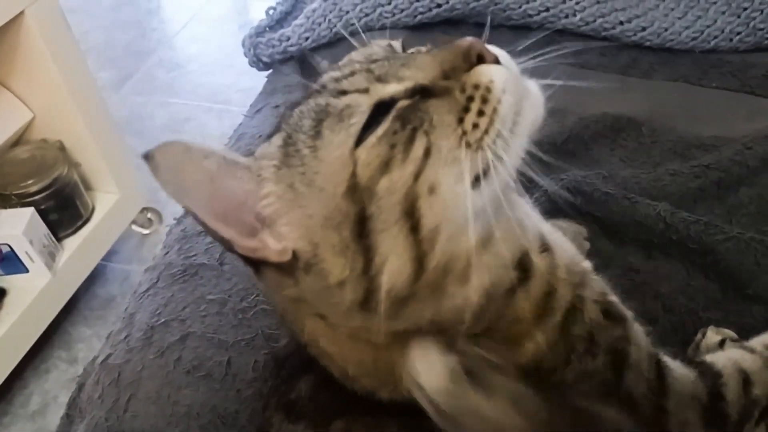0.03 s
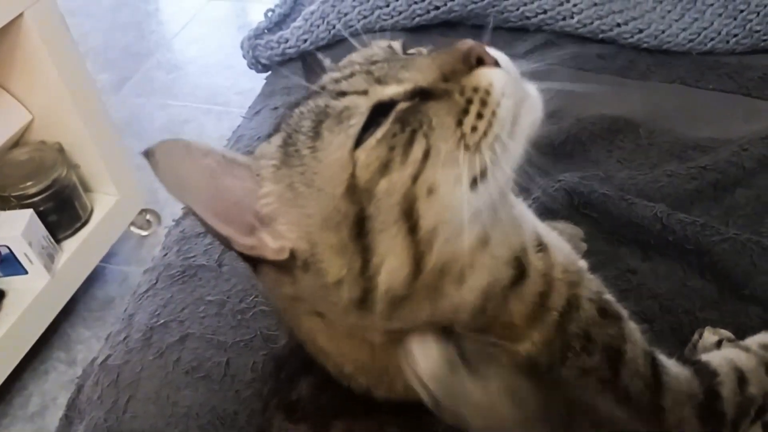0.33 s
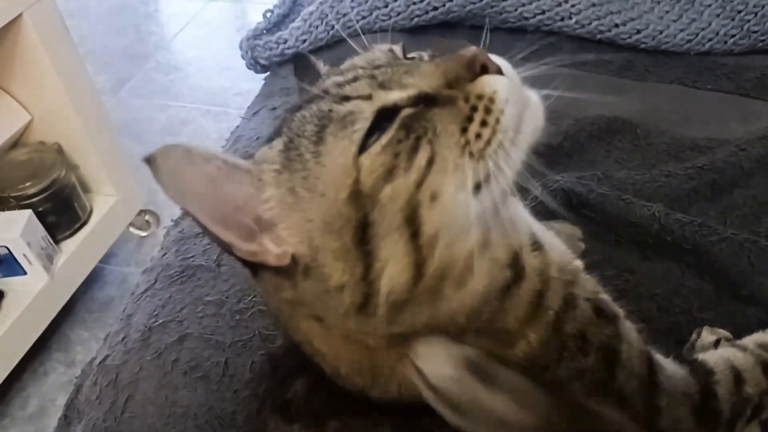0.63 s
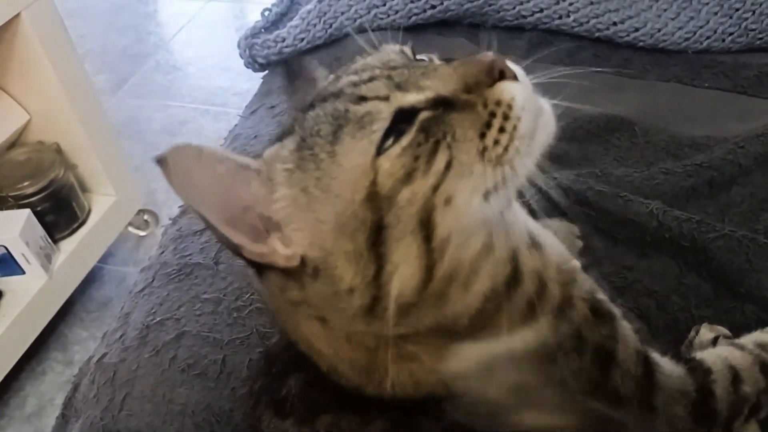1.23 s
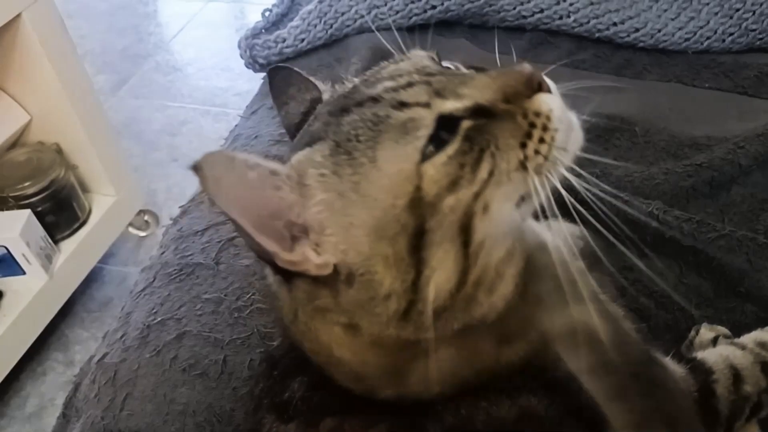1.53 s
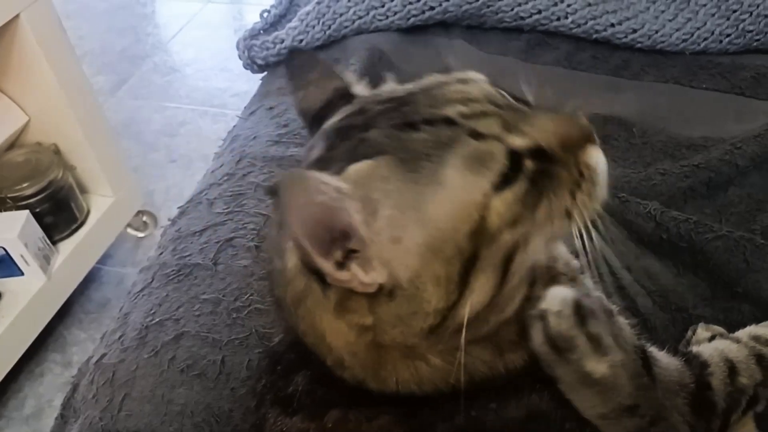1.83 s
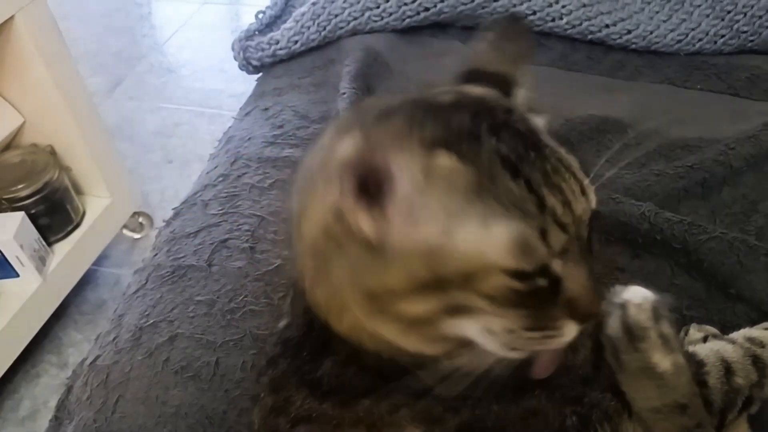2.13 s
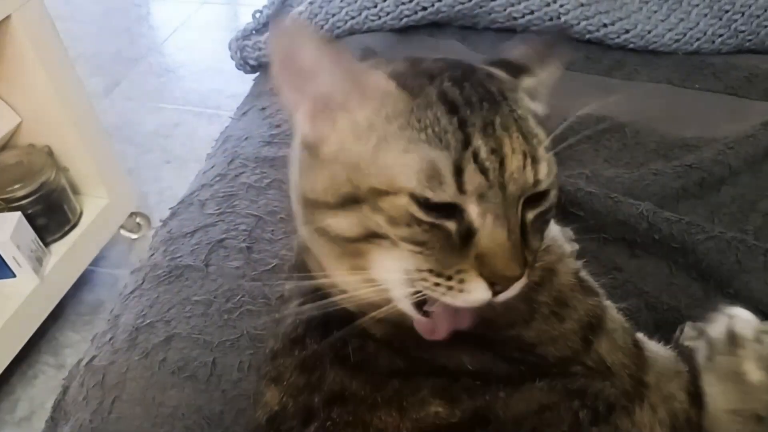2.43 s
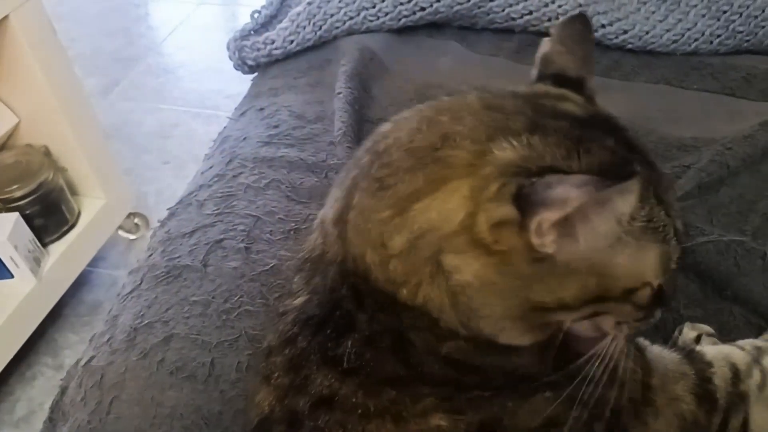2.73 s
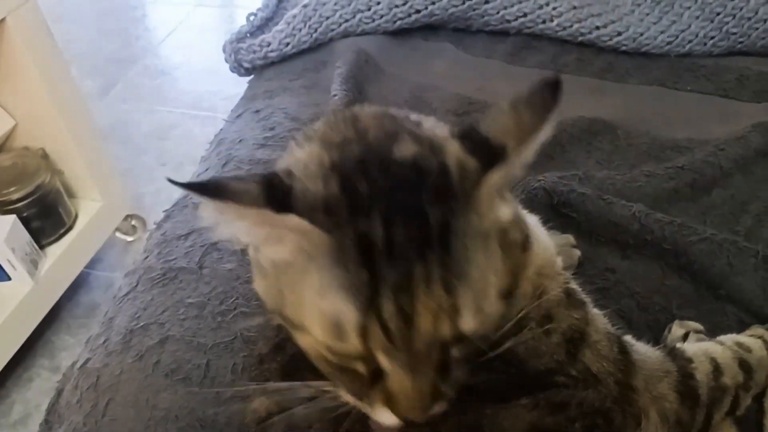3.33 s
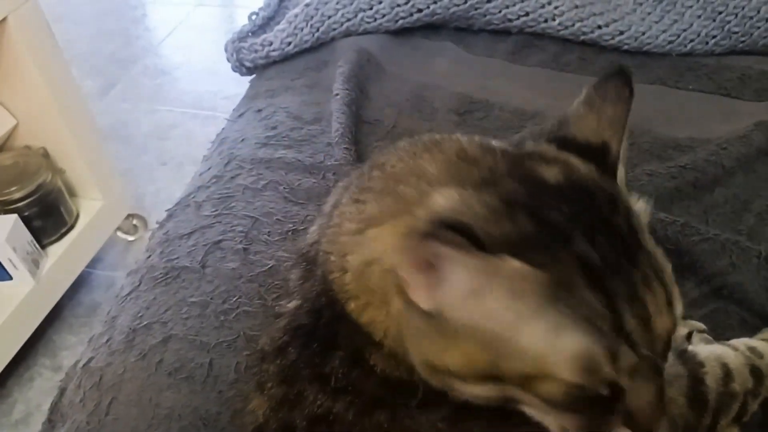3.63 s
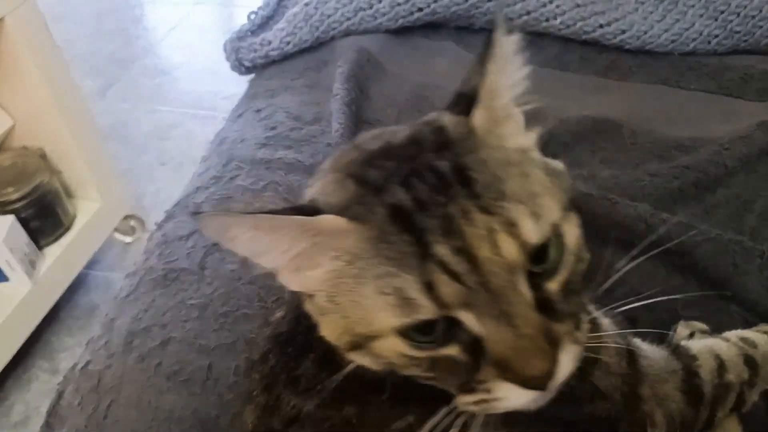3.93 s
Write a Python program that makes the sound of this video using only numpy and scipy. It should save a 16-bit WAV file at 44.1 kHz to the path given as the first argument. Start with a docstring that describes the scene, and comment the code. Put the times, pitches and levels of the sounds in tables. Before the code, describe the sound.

Close by in a quiet room, a cat scratches its fur in quick, faint strokes, rustling a blanket, then licks its coat with small wet ticks. A muffled vehicle swells past outside during the licking.

```python
"""Close to the microphones, a cat on a blanket scratches its neck with a hind paw, claws flicking through
the fur about six strokes a second; then its barbed tongue rasps over the coat with small wet ticks.
Farther off, muffled by the walls, a vehicle pulls away, changes gear and drones past with a swell of
road noise. A soft hiss rises and falls, and the quiet room hums faintly around the stereo pair."""
import sys
import numpy as np
from scipy import signal
from scipy.fft import rfft, irfft
from scipy.io import wavfile
from scipy.ndimage import uniform_filter1d

SR = 44100
rng = np.random.default_rng(int(sys.argv[2]) if len(sys.argv) > 2 else 0)


def digitize_waveform(pressure):
    """Quantize a signal to 16-bit integers and store it at the path in sys.argv[1].

    Rows of a 2-D input are taken as channels; values are limited to [-1, 1].
    """
    field = np.atleast_2d(pressure).T
    bounded = np.clip(field, -1, 1)
    quanta = np.round(bounded * 32767).astype(np.int16)
    wavfile.write(sys.argv[1], SR, quanta)


N = 176400
PAW_PAN_DB = 3.5  # the paw works a little left of centre


def scratching():
    """Each stroke flicks a swell of hairs past the claws, bright tips first; the fur then brushes back."""
    # claw strokes: peak_s, level_db, rise_s
    strokes = [(0.027, -65, 0.0098), (.170, -60, .0055), (0.315, -65, 0.011), (0.462, -63, 0.0075),
               (.617, -66, 0.005), (0.772, -61, 0.0067), (0.926, -60, 0.005), (1.084, -62, 0.0079),
               (1.239, -64.5, 0.0077), (1.406, -71, 0.0097), (1.586, -71.5, 0.014)]
    # spectrum of claws in fur: frequency_hz, relative_db
    fur_spectrum = [(500, -8), (1200, 2.5), (2000, -11), (2700, -3.5), (3700, -13), (5200, -4),
                    (10000, -5.5), (11800, 0), (13500, 2), (15500, -2)]
    fall_share, tail_s, tail_db = .85, .052, -73
    tip_hz, tip_lead_s = 10000, .002
    t, swell, tail = clock(), 0, 0
    for peak_s, level_db, rise_s in strokes:
        age = t - peak_s
        spread_s = np.where(age < 0, rise_s, rise_s * fall_share)
        swell = swell + undb(level_db) * np.exp(-(age / spread_s) ** 2 / 2)
        tail = tail + undb(tail_db) * (age > 0) * np.exp(-abs(age) / tail_s)
    hairs = colour(crackle(per_s=8000, scatter_db=2.5), fur_spectrum) * pan(PAW_PAN_DB)
    tips = signal.sosfiltfilt(signal.butter(2, tip_hz, "high", fs=SR, output="sos"), hairs)
    early = np.interp(t + tip_lead_s / 2, t, swell)
    late = np.interp(t - tip_lead_s / 2, t, swell)
    brush_back = tail * colour(rng.standard_normal((2, N)), fur_spectrum)
    return tips * early + (hairs - tips) * late + brush_back


def paw_taps():
    """The paw meets the skin: two short dry knocks and one longer scrape."""
    # contacts: start_s, level_db, decay_s
    taps = [(.1765, -65, .002), (.3218, -50.5, .0011), (1.068, -61, .022)]
    # bands that each contact rings: pitch_hz, width_hz, offset_db
    modes = [(1050, 700, -1), (1600, 700, -2), (2600, 900, -7)]
    knocks = sum(snap(start_s, pitch_hz, width_hz, level_db + offset_db, decay_s)
                 for start_s, level_db, decay_s in taps for pitch_hz, width_hz, offset_db in modes)
    return knocks * pan(PAW_PAN_DB)


def licking():
    """Tongue barbs catch and slip through the fur in quick jerks."""
    # resonant bands of two licks: middle_s, half_length_s, pitch_hz, width_hz, level_db
    licks = [(2.184, 0.11, 2560, 328, -69.5), (2.18, 0.086, 5700, 2400, -73),
             (2.17, 0.098, 12000, 3500, -74), (3.07, 0.11, 11400, 3241, -72),
             (3.103, 0.094, 6340, 800, -71), (3.066, 0.059, 2640, 390, -72.5)]
    catch_hz, catch_depth_db = 66.1, 4
    catch_phase = phase_of(catch_hz * (1 + 0.1146 * wander(rate_hz=30)))
    catch = undb(catch_depth_db * np.sin(catch_phase))
    t, rasps = clock(), 0
    for middle_s, half_length_s, pitch_hz, width_hz, level_db in licks:
        barbs = catch * crackle(per_s=1300, scatter_db=1.5)
        rasp = unit(ring(ring(barbs, pitch_hz, 2 * width_hz), pitch_hz, 2 * width_hz))
        swell = undb(level_db) * np.exp(-((t - middle_s) / half_length_s) ** 2 / 2)
        rasps = rasps + swell * rasp
    return rasps


def wet_ticks():
    """Films of saliva snap on tongue and lips; the narrow-band ones ring briefly."""
    # ticks and smacks: start_s, pitch_hz, width_hz, peak_db
    ticks = [(2.11, 2520, 300, -55.5), (2.127, 6500, 1200, -58), (2.2318, 2600, 400, -49),
             (2.269, 14000, 3000, -53), (2.282, 10400, 4000, -56), (2.2995, 5550, 1200, -51.5),
             (2.2992, 2600, 550, -53), (2.8135, 1750, 1100, -44.5), (2.977, 6300, 2200, -54),
             (3, 10100, 900, -55), (3.076, 6700, 1000, -53), (3.844, 2650, 260, -48.5),
             (3.846, 8100, 600, -64), (3.877, 2620, 240, -55)]
    return sum(snap(*tick, decay_s=.002) for tick in ticks)


def blanket():
    """The cat's rocking body rubs a dull rustle out of the soft blanket."""
    # loudness of the rustle: time_s, level_db
    levels = [(0, -62.5), (.04, -56), (.1, -58), (.15, -55.5), (.24, -55.5), (.38, -61), (.5, -57),
              (.78, -56), (.88, -55.5), (1.0, -53.5), (1.09, -50.5), (1.2, -56), (1.8, -59.5), (2.2, -54)]
    # spectrum of the rustle: frequency_hz, relative_db
    spectrum = [(30, -29), (56, -6.5), (85, 3), (160, -2.5), (225, 1), (330, -4), (470, -11), (1000, -27.5),
                (4000, -43.5)]
    return colour(diffuse(), spectrum) * undb(curve(levels))


def vehicle():
    """The firing note and its sixth harmonic come through the walls; road noise rings the room."""
    # engine drone, low gear then high gear: time_s, firing_hz, level_db
    engine = [(0, 98, -62), (.23, 115, -54.5), (.3, 113.4, -88), (.62, 114, -71), (.76, 118, -53),
              (.9, 121, -59.5), (1.0, 125, -51.5), (1.15, 128, -49.5), (1.22, 126, -71),
              (1.55, 68.45, -63.5), (2.02, 76, -58), (2.17, 77.85, -48.5), (2.42, 81.5, -44),
              (2.59, 84.3, -39), (2.72, 84.5, -55), (2.84, 85, -47.5), (2.96, 86.5, -48.5),
              (3.16, 88, -58.5), (3.5, 89, -50.5), (3.62, 89.5, -56), (3.88, 90, -49.5), (4, 90, -59)]
    # swell of the road noise: time_s, level_db
    road_levels = [(0, -71.5), (.8, -79), (1.4, -66.5), (1.8, -61.5), (2.15, -54.5), (2.6, -51.5),
                   (3.05, -52), (3.3, -54.5), (3.6, -54.5), (4, -53)]
    # road noise as heard indoors: frequency_hz, relative_db
    road_spectrum = [(50, -34), (75, -4.5), (125, 6.5), (165, -4), (240, 0), (380, -5), (620, -8.5),
                     (720, -9), (920, -5.5), (1250, -17.5), (1550, -12), (1950, -22.5), (2500, -23),
                     (4000, -40.5)]
    # room resonances: pitch_hz, width_hz, level_against_road_db
    room_modes = [(468.3, 7.5, -12.5), (617.4, 19, -12), (530.3, 4, -14), (1551, 21, -21.5)]
    pitch_jitter, waver_db = 0.00836, 0.45
    harmonic_against_road_db, harmonic_waver_db = -14, 4.2
    road_gain = undb(curve(road_levels))
    phase = phase_of(curve(engine) * (1 + pitch_jitter * wander(rate_hz=24.9)))
    drone_db = curve(engine, column=2) + waver_db * wander(rate_hz=22.36)
    drone = np.sqrt(2) * np.sin(phase) * undb(drone_db)
    harmonic_db = harmonic_against_road_db + harmonic_waver_db * wander(rate_hz=5.65)
    harmonic = np.sin(6 * phase) * road_gain * undb(harmonic_db)
    road = colour(diffuse(), road_spectrum)
    ringing = sum(undb(db) * unit(ring(diffuse(), hz, width_hz)) for hz, width_hz, db in room_modes)
    return (drone + harmonic) * pan(-1.4) + (road + ringing) * road_gain


def hiss():
    """A fine hiss swells and fades; a band at the very top comes in waves and drifts down in pitch."""
    # swell of the hiss: time_s, level_db
    levels = [(.9, -97), (1.45, -84), (1.88, -77.5), (2.02, -76), (2.15, -73), (2.55, -71.5), (2.9, -74.5),
              (3.55, -77), (4, -84)]
    # spectrum of the hiss: frequency_hz, relative_db
    spectrum = [(2500, -11), (4100, -7), (5200, -0.5), (7500, -4), (9600, -3), (13500, -9), (15500, -11.5)]
    # path of the top band: time_s, centre_hz, level_db
    top_path = [(1.7, 13700, -92), (1.9, 13600, -73.5), (2.2, 12600, -76.5), (2.38, 13300, -77),
                (2.52, 13730, -72.5), (2.9, 13300, -78.5), (3.02, 13300, -80), (3.28, 12100, -82.5),
                (3.55, 12100, -83), (3.78, 11900, -100)]
    top_width_hz = 2300
    body = colour(rng.standard_normal((2, N)), spectrum) * undb(curve(levels))
    lowpass = signal.butter(2, top_width_hz / 2, fs=SR, output="sos")
    band = signal.sosfilt(lowpass, rng.standard_normal((2, N)))
    top = unit(band * np.sin(phase_of(curve(top_path))))  # shifts the band up to its moving centre
    return body + top * undb(curve(top_path, column=2)) * pan(3)


def room_tone():
    """Still air all round the microphones, and a faint wavering hum."""
    # spectrum of the air: frequency_hz, relative_db
    air_spectrum = [(25, -23.5), (60, 3), (120, 8), (330, -3.5), (520, -5.5), (800, -25.5), (1500, -19.5),
                    (2200, -31), (3800, -36), (7200, -32.5), (10000, -48)]
    air_db, hum_hz, hum_width_hz, hum_db = -63.5, 462.3, 9, -73
    air = colour(diffuse(), air_spectrum)
    hum = unit(ring(ring(diffuse(), hum_hz, hum_width_hz), hum_hz, hum_width_hz))
    return undb(air_db) * air + undb(hum_db) * hum


def diffuse():
    """Noise from all round as the two microphones get it: alike in the bass, unrelated above."""
    # stereo image of the pair: frequency_hz, likeness_0_to_1, left_minus_right_db
    microphone_pair = [(62, 1, -4.5), (124, 0.93, -1), (400, 0.89, -1.9), (657, 0.14, -5.5), (1190, 0, 9.5),
                       (2400, 0, -1)]
    likeness = np.clip(across(microphone_pair), -1, 1)
    lean_db = across(microphone_pair, column=2) / 2
    mid, side = rfft(rng.standard_normal((2, N)))
    mid, side = mid * np.sqrt(1 + likeness), side * np.sqrt(1 - likeness)
    return irfft(np.array([(mid + side) * undb(lean_db), (mid - side) * undb(-lean_db)]), N)


def crackle(per_s, scatter_db):
    """Random tiny clicks of uneven size in each channel."""
    hits = rng.random((2, N)) < per_s / SR
    signs = rng.choice([-1, 1], (2, N))
    sizes = undb(scatter_db * rng.standard_normal((2, N)))
    return unit(hits * signs * sizes)


def snap(start_s, pitch_hz, width_hz, peak_db, decay_s):
    """A tiny burst of noise that rings one band."""
    age = np.arange(SR // 10) / SR
    rise_s = .35 * decay_s
    burst = (1 - np.exp(-age / rise_s)) * np.exp(-age / decay_s) * rng.standard_normal((2, len(age)))
    edges_hz = [pitch_hz - width_hz / 2, pitch_hz + width_hz / 2]
    band = signal.sosfilt(signal.butter(3, edges_hz, "band", fs=SR, output="sos"), burst)
    sound = undb(peak_db) * band / abs(band).max(axis=1, keepdims=True)
    return np.pad(sound, ((0, 0), (int(start_s * SR), N)))[:, :N]


def wander(rate_hz):
    """Smooth random drift at rms 1."""
    hold = int(SR / rate_hz)
    steps = np.repeat(rng.standard_normal(N // hold + 1), hold)
    return unit(uniform_filter1d(uniform_filter1d(steps, hold), hold)[:N])


def ring(x, pitch_hz, width_hz):
    """A two-pole resonance."""
    return signal.lfilter(*signal.iirpeak(pitch_hz, pitch_hz / width_hz, fs=SR), x)


def colour(x, spectrum):
    """Shape a sound with a spectrum table, at rms 1."""
    return unit(irfft(rfft(x) * undb(across(spectrum)), N))


def curve(rows, column=1):
    """One column of a table, joined by straight lines in time."""
    rows = np.array(rows)
    return np.interp(clock(), rows[:, 0], rows[:, column])


def across(rows, column=1):
    """One column of a table, joined by straight lines over log frequency."""
    rows = np.array(rows)
    bins_hz = np.arange(N // 2 + 1) * SR / N
    return np.interp(np.log(bins_hz + 1), np.log(rows[:, 0]), rows[:, column])


def phase_of(pitch_hz):
    """Running phase of a moving pitch, in radians."""
    return 2 * np.pi * np.cumsum(pitch_hz) / SR


def pan(db):
    """Channel gains that put the left this many decibels above the right."""
    return undb(np.array([[db], [-db]]) / 2)


def undb(db):
    """Decibels to gain."""
    return 10 ** (np.asarray(db) / 20)


def unit(x):
    """Scale to rms 1."""
    return x / np.sqrt(np.mean(x ** 2) + 1e-30)


def clock():
    """Time of each sample in seconds."""
    return np.arange(N) / SR


def scene():
    """The cat close by, the vehicle beyond the walls, the room all round."""
    cat = scratching() + paw_taps() + blanket() + licking() + wet_ticks()
    return cat + vehicle() + hiss() + room_tone()


def record(dry):
    """The left microphone port rings a little, the right one is duller; the recorder cuts the top."""
    right_top_hz, recorder_top_hz = 14300, 15700
    left = dry[0] + 0.69 * ring(dry[0], pitch_hz=7320, width_hz=450)
    right = signal.sosfiltfilt(signal.butter(2, right_top_hz, fs=SR, output="sos"), dry[1])
    steep_lowpass = signal.ellip(10, .2, 70, recorder_top_hz, fs=SR, output="sos")
    return signal.sosfilt(steep_lowpass, np.array([left, right]))


dry = scene()
out = record(dry)
digitize_waveform(out)
```